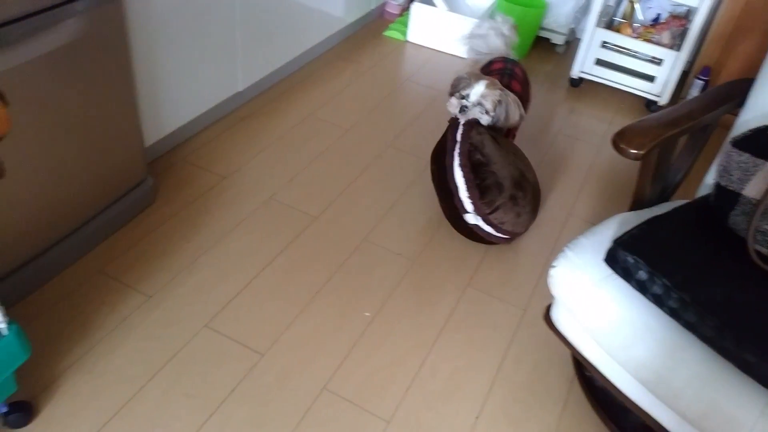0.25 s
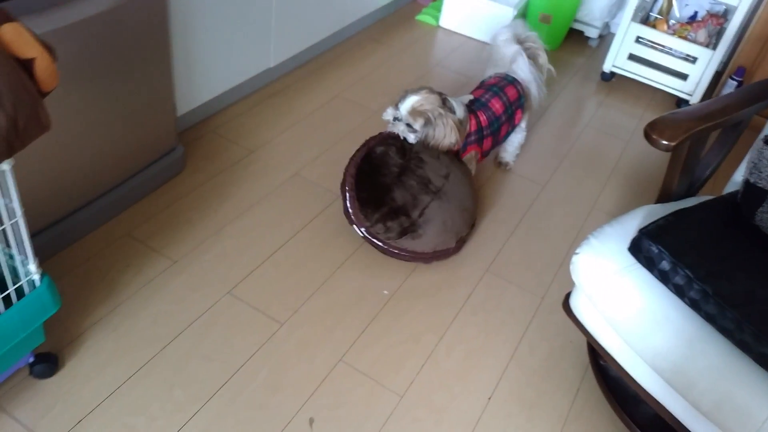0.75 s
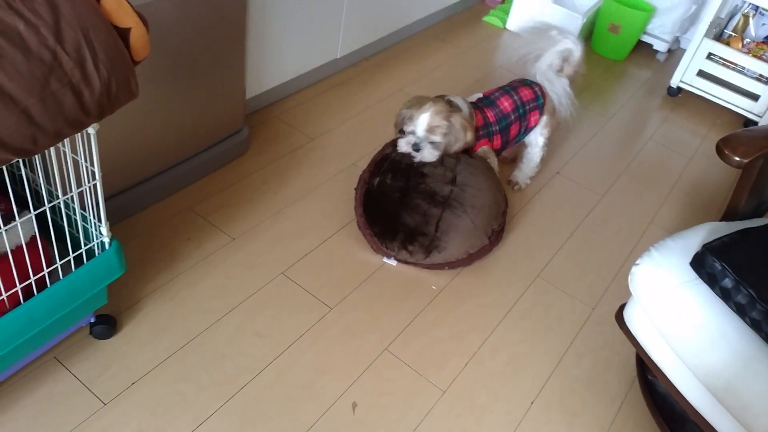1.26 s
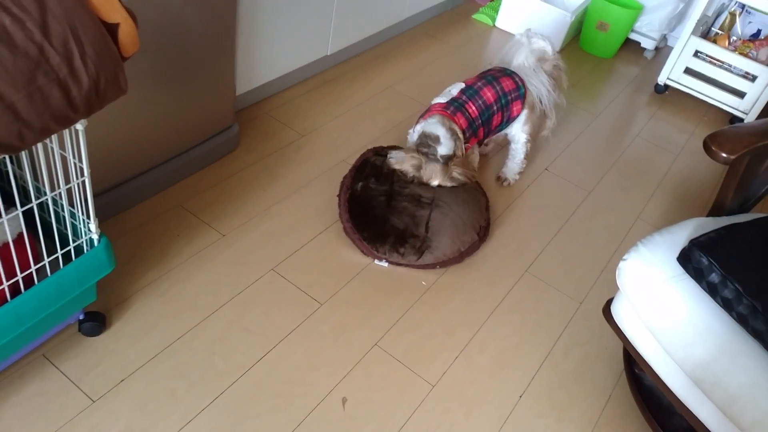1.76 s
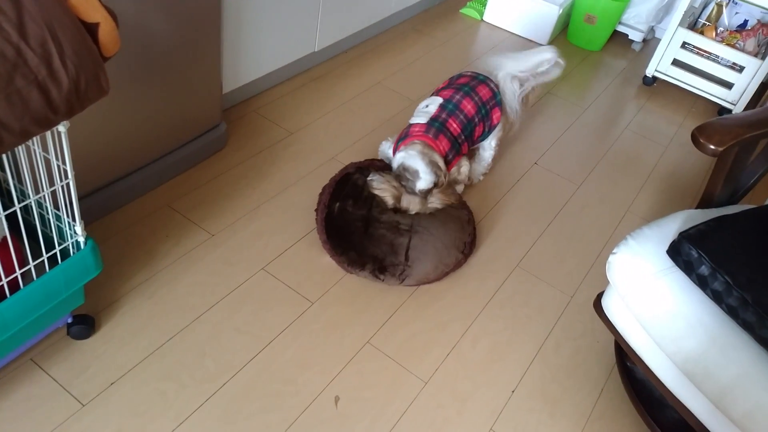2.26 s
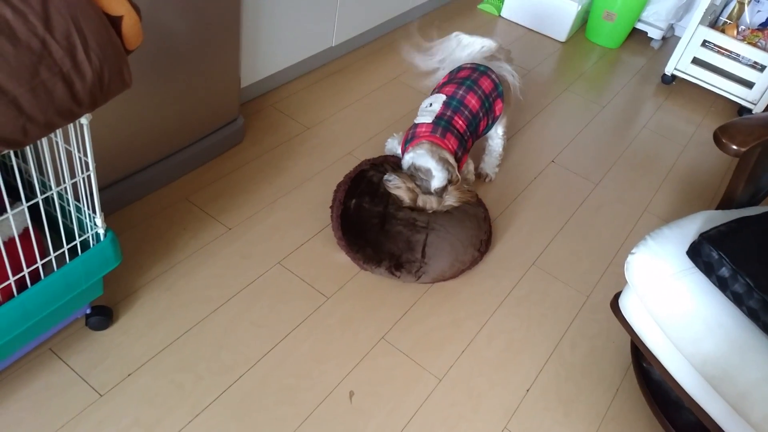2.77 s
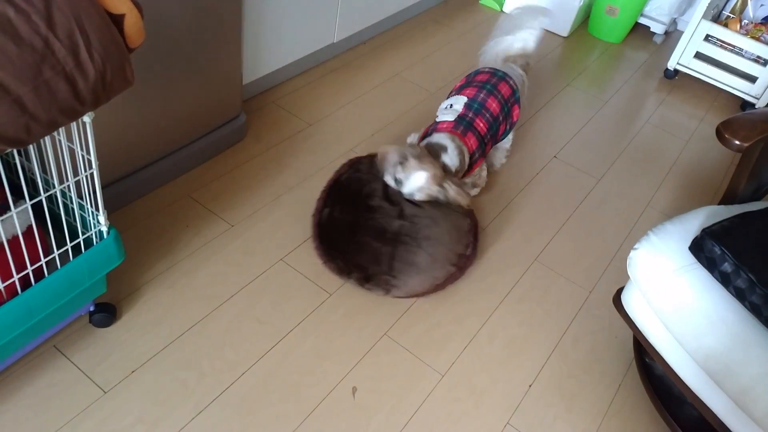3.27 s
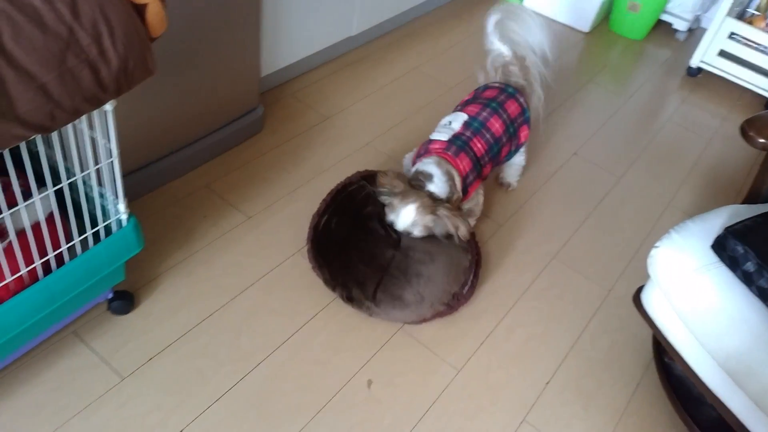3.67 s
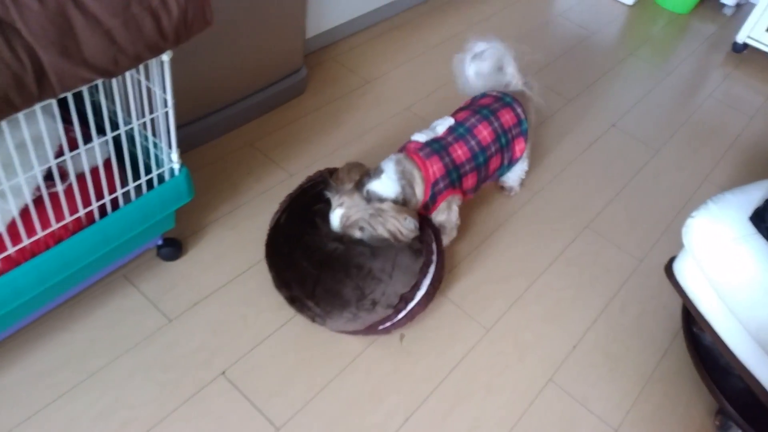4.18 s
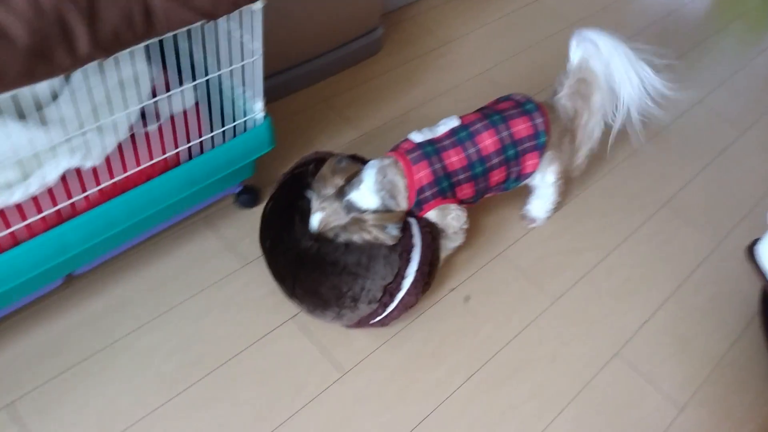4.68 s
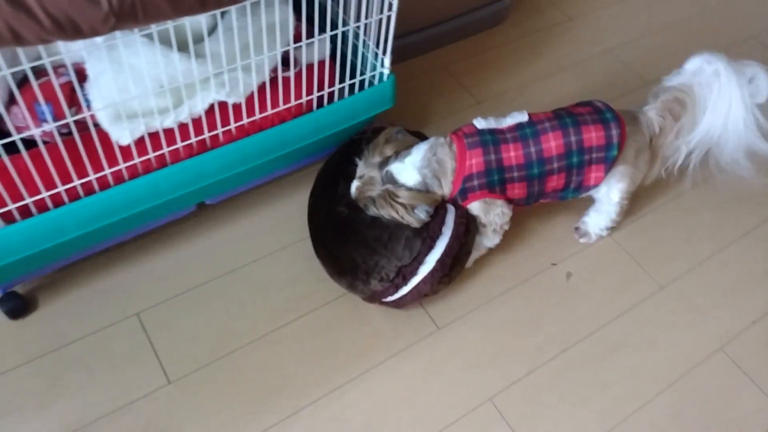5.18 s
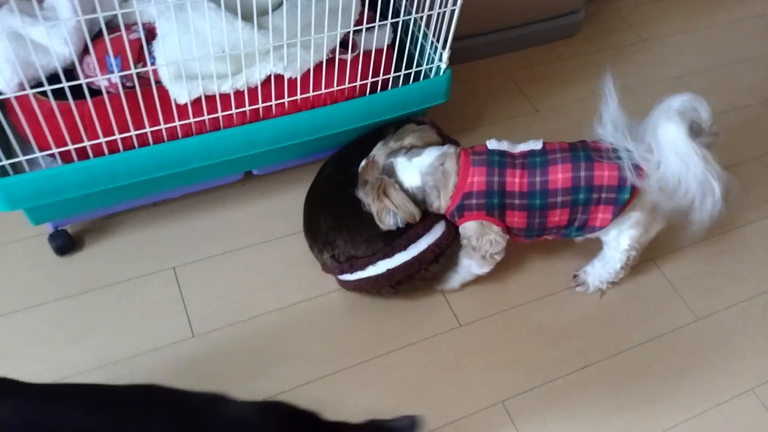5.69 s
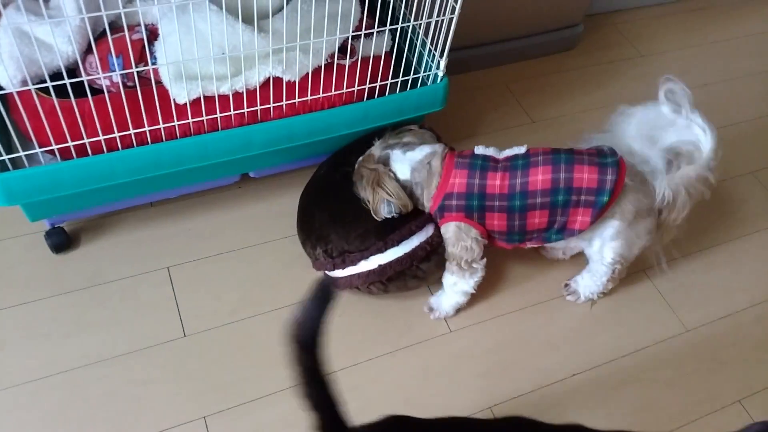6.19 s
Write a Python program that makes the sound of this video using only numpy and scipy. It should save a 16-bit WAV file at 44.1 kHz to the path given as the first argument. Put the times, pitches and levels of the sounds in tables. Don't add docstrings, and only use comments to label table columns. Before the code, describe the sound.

In a furnished room, a small dog pushes a cushion across a wooden floor. Claws skid and low thumps come quickly at first, then quieter, scattered ticks and soft scrapes follow. From the middle onward, clicks become sharper and scrabbles louder, busiest near the end. A low hum swells with the shoves under soft air. The small microphone makes the claws bright and piercing, with short room echoes.

```python
import sys
import numpy as np
from scipy import signal
from scipy.io import wavfile
from scipy.ndimage import uniform_filter1d

SR = 44100
rng = np.random.default_rng(int(sys.argv[2]) if len(sys.argv) > 2 else 0)


def ratio(d):
    e = np.asarray(d, float) / 20
    return 10 ** e


def file_out(sig):
    cols = np.atleast_2d(sig).T
    lim = np.clip(cols, -1, 1)
    pcm = np.round(lim * 32767).astype(np.int16)
    wavfile.write(sys.argv[1], SR, pcm)


N = 284004
SPOTS = 4


def evened(x):
    return x / np.sqrt(np.mean(x ** 2) + 1e-20)


def read(points, hz):
    f, value = np.transpose(points)
    return np.interp(np.log(hz + 1), np.log(f + 1), value)


def curve(rows):
    s, db = np.transpose(rows)
    return np.interp(np.arange(N) / SR, s, db)


def add(mix, s, sound):
    part = mix[round(s * SR):][:len(sound)]
    part += sound[:len(part)]


def band(x, lo_hz, hi_hz):
    return signal.sosfilt(signal.butter(2, [lo_hz, hi_hz], "band", fs=SR, output="sos"), x)


def noise(points, patchy_db, size):
    frames = 4 * N // size + 5
    hz = np.fft.rfftfreq(size, 1 / SR)
    a, b, patches = rng.standard_normal((frames, len(hz), 3)).T
    patches = uniform_filter1d(uniform_filter1d(patches, 8, 0), 8, 1)
    level_db = read(points, hz)[:, None] + patchy_db * evened(patches)
    z = (a + 1j * b) * ratio(level_db)
    return signal.istft(z, nperseg=size, noverlap=3 * size // 4)[1][:N]


# (time [s], level [dB])
HUM = [(0, -44), (.5, -39), (1.1, -42), (1.6, -43), (2.4, -46.5), (3.5, -49.5), (4.5, -49), (5.3, -55),
       (6.44, -49.5)]
# (time of the crest [s], level [dB])
SURGES = [(.15, -35), (.32, -29), (.98, -34), (1.07, -32.5), (1.35, -41), (1.87, -39), (2.04, -37.5),
          (2.169, -35), (2.4, -38.5), (2.64, -58), (2.78, -44), (3.14, -34), (3.25, -60), (3.35, -39),
          (3.931, -31), (4.14, -60), (4.29, -44.5), (4.4, -50), (4.52, -43.5), (4.701, -28), (4.75, -42),
          (4.9, -51), (5.07, -46), (5.36, -42), (5.539, -31.5), (5.6, -34.5), (6.01, -44.5), (6.329, -50)]


def shoves():
    rise_s, fall_s = 0.014, 0.03
    t = np.arange(N) / SR
    strength = ratio(curve(HUM))
    for s, db in SURGES:
        swell = np.exp(-abs(t - s) / np.where(t < s, rise_s, fall_s))
        strength = np.hypot(strength, ratio(db) * swell)
    return strength


def hum():
    hum_hz, waver_hz = 59.14, 0.53
    waver = uniform_filter1d(uniform_filter1d(rng.standard_normal(N), size=3000), size=3000)
    pitch_hz = hum_hz + waver_hz * evened(waver)
    return np.sqrt(2) * shoves() * np.sin(2 * np.pi * np.cumsum(pitch_hz) / SR)


# (frequency [Hz], level [dB per Hz])
AIR = [(40, 10), (80, 12), (250, 5), (500, -5), (1000, -6.5), (2000, -15.5), (4000, -25), (5200, -55),
       (6000, -37), (7500, -56), (10000, -35), (16000, -43), (16900, -37), (17300, -76)]


def air():
    steady = noise(AIR, 1.2, size=2048)
    return ratio(-62) * band(steady, 28, 20000) / band(steady, 176, 1400).std()


# (frequency [Hz], level [dB per Hz])
RUSTLE = [(30, -6.5), (70, 2.5), (110, -3), (200, -7.5), (400, -11), (900, -16), (1500, -42)]
# (time [s], level [dB])
DRAG = [(0, -45.5), (.14, -75), (.95, -54.5), (1.11, -62.5), (1.43, -71.5), (1.74, -83), (1.9, -68.5),
        (2.48, -58), (2.76, -87), (3.17, -78.5), (3.44, -56), (4.1, -68.5), (4.8, -56.5), (5.5, -56),
        (5.75, -65), (5.97, -62.5), (6.22, -87.5), (6.42, -46)]


def rustle():
    knee_db = -73.5
    shove_share = 0.34
    swell = np.minimum(shoves() / ratio(curve(HUM)), 3.2) ** shove_share
    level_db = -53.5 + np.minimum(curve(DRAG) - knee_db, 0)
    return ratio(level_db) * evened(noise(RUSTLE, 3.6, size=1024)) * swell


def grit(shape, spread_db, share):
    clumps = evened(uniform_filter1d(rng.standard_normal(shape), 50, -1))
    slips = rng.standard_normal(shape) * (rng.random(shape) < share)
    return evened(ratio(spread_db * clumps) * slips)


def cushion():
    drag = ratio(curve(DRAG) - 3.5) * grit((SPOTS, N), 5.5, 0.22)
    return drag + ratio(1) * band(drag, 12500, 13000)


def plank(x, hz, width_hz, db):
    return x + ratio(db) * signal.lfilter(*signal.iirpeak(hz, hz / width_hz, SR), x)


def claws(rows, envelope, spread_db, share, gain_db):
    t = np.arange(6000) / SR
    low, mid, top = np.zeros((3, SPOTS, N))
    bursts = grit((len(rows), len(t)), spread_db, share)
    plank_hz = 1200 * 3.2 ** rng.random(len(rows))
    for k, (s, db, knock_db, edge_db, *shape) in enumerate(rows):
        spot = k % SPOTS
        grip = envelope(t, *shape)
        loudness = ratio(db + gain_db) * np.sqrt(np.mean(grip ** 2))
        burst = loudness * evened(bursts[k] * grip)
        add(low[spot], s, ratio(knock_db + 15) * plank(burst, plank_hz[k], 700, -3))
        add(mid[spot], s, burst)
        add(top[spot], s, ratio(edge_db + 23) * burst * (grip / grip.max()) ** 0.52)
    return band(low, 200, 3900) + band(mid, 3900, 9800) + band(top, 9800, 20500)


def slipping(fade):
    def envelope(t, rise):
        swell = np.minimum(t / rise, 1) ** 2
        return swell * np.exp(-np.maximum(t / rise - 1, 0) / fade)
    return envelope


# (time [s], level [dB], wood knock [dB], edge brightness [dB], rise [s])
SKIDS = [(0.002, -27.5, -13, -13, 0.0014), (0.245, -31, -16.5, -19, 0.0071),
         (0.368, -46, -14, -17.5, 0.014), (0.502, -31.5, -16, -23, .011),
         (0.6494, -37.5, -16.5, -16, 0.0061), (0.743, -53, -15.5, -19, 0.0071),
         (0.791, -39.5, -15, -20, 0.0086), (0.9604, -45.5, -14, -30, 0.011),
         (1.3294, -43.5, -11.5, -18.5, 0.0093), (1.98, -41, -15, -22.5, .011),
         (2.1946, -37, -13.5, -18.5, 0.0085), (2.9694, -65, -14, -33, 0.016),
         (3.109, -50, -15, -24, 0.0023), (3.2635, -48, -12, -39, 0.015), (3.652, -40, -13.5, -22, .016),
         (3.868, -39, -15, -17, 0.02), (4.143, -38, -13, -18, 0.0063), (4.684, -34, -14.5, -17.5, 0.012),
         (5.205, -37.5, -15, -16.5, 0.015), (5.3407, -34.5, -19, -14.5, 0.0055),
         (6.238, -44.5, -10, -17.5, 0.019)]


def skids():
    return claws(SKIDS, slipping(1.48), spread_db=3, share=0.15, gain_db=5.27)


def tap(t, slide_db):
    slide_s = 0.038
    strike = 2.5 * np.exp(-t / 0.0002) + 1.5 * np.exp(-t / 0.0028)
    return strike + ratio(slide_db) * np.exp(-t / slide_s)


# (time [s], level [dB], wood knock [dB], edge brightness [dB], slide after the tap [dB])
TICKS = [(0.1351, -39, -16.5, -10.5, 1), (0.463, -39, -17.5, -13, -0.5), (1.026, -29, -18.5, -16, -23),
         (1.2509, -39.5, -16, -13, -1.5), (1.785, -45, -15.5, -14, 0.5), (2.2758, -26, -17, -10.5, -11.5),
         (2.5612, -34.5, -17.5, -16, -13), (3.4232, -34, -22, -10.5, -20), (3.492, -19, -16.5, -15, -19),
         (3.8101, -34, -18, -16.5, -12.5), (4.0177, -18.5, -18.5, -15, -22.5),
         (4.2914, -28.5, -14.5, -12, -13.5), (4.559, -34.5, -17.5, -14, -22), (4.6013, -34, -15, -12.5, -2),
         (4.793, -31, -17.5, -15, -6), (4.8898, -31, -33, -11.5, -10.5), (5.079, -20, -17, -15.5, -34),
         (5.3184, -28.5, -18, -19.5, -31), (5.5085, -25, -11.5, -33.5, -19),
         (5.579, -13.5, -16, -12.5, -43), (5.6569, -30, -15, -28, -10.5), (5.8089, -22.5, -16, -18, -37.5),
         (5.8218, -28.5, -17, -9, -18)]


def taps():
    return claws(TICKS, tap, spread_db=2.5, share=0.42, gain_db=2.45)


# (time [s], level [dB])
CREAKS = [
    (1.8595, -32),
    (2.0985, -53),
    (3.8265, -38),
    (3.115, -42),
    (4.517, -48),
    (4.884, -42),
    (3.722, -44),
    (6.022, -43),
    (6.096, -47),
    (.755, -52),
]


def creaks():
    tip_db = 11.5
    tips = [(s, db + edge_db + tip_db) for s, db, _, edge_db, _ in TICKS]
    out = np.zeros(N)
    for s, db in list(CREAKS) + tips:
        add(out, s, ratio(db) * np.array([1, -0.4]))
    return band(out, 4200, 17000)


def thump(db, hz, rise_ms, knock_db):
    board_cycles = 5.47
    ms = np.arange(8000) / SR * 1000
    turns = hz * ms / 1000 + 0.55 * (1 - np.exp(-ms / 1.2))
    onset = (1 - np.exp(-ms / max(rise_ms, 0.3))) ** 2
    body = np.sin(2 * np.pi * turns) * onset * ratio(-60 * (turns / board_cycles) ** 1.364)
    knock_shape = 0.93 * np.exp(-ms / 1.19) * (1 - np.exp(-ms / 0.26))
    knock = np.sin(2 * np.pi * 0.71 * ms) * knock_shape
    return ratio(db + 3) * (body + ratio(knock_db) * knock)


# (time [s], level [dB], settling pitch [Hz], rise [ms], heel knock [dB])
STEPS = [(0.1862, -13.5, 109, 3.4, -33), (.2925, -12, 124, 3, -21), (0.606, -23.5, 110.3, 2.8, -30),
         (0.7753, -12.5, 113, 2.7, -21), (0.939, -22, 109.6, 3.3, -35), (1.047, -28, 117, 1.6, -14),
         (1.36, -26, 117.1, 6, -34), (3.116, -15.5, 95, 1.13, -9), (3.58, -44, 124, 2.9, -30),
         (3.68, -27, 126.3, 6.2, -30), (3.917, -15.5, 127, 1.9, -24), (4.6836, -13.5, 102.6, 0.69, -4),
         (5.012, -32, 153.4, 0.7, -17), (5.5344, -15, 105, 0.9, -11), (6.246, -42, 132, 1.8, -14)]


def footsteps():
    steps = np.zeros(N)
    for s, *row in STEPS:
        add(steps, s, thump(*row))
    return signal.lfilter(*signal.butter(2, 1400, fs=SR), steps)


# (time [s], level [dB], wood knock [dB], edge brightness [dB], rise [s])
SWELLS = [
    (1.42, -37.5, -15.5, -18.5, 0.034),
    (2.141, -56.5, -7.5, -19, 0.022),
    (2.43, -35.5, -15, -18, 0.025),
    (3.372, -31, -14.5, -17.5, 0.036),
    (4.428, -29, -14, -21, .02),
    (4.865, -32, -16, -15.5, 0.013),
    (4.958, -28, -13.5, -15, 0.0097),
    (5.425, -23, -18, -19, 0.028),
    (5.66, -30, -18, -20, 0.013),
    (6.325, -35, -16.5, -18.5, .038),
]


def scrabbles():
    return claws(SWELLS, slipping(0.88), spread_db=4, share=0.3, gain_db=6.27)


# (frequency [Hz], time to lose 60 dB [s])
ROOM = [(100, 0.36), (500, 0.091), (1300, 0.34), (3500, 0.32), (9000, 0.18), (16000, 0.21)]
# (delay [s], level [dB])
ECHOES = [(.002, 3), (.0037, -8), (.007, -6), (0.011, -16.5), (0.014, -2.5), (.021, -8.5)]


def room(x, wet_db):
    sparse = np.zeros(SR // 2)
    at = np.arange(300, len(sparse) - 20, 20)
    sparse[at + rng.integers(0, 20, len(at))] = rng.choice([-1., 1.], len(at))
    hz, t, z = signal.stft(sparse, SR, nperseg=256)
    fading = z * ratio(-60 * t / read(ROOM, hz)[:, None])
    tail = signal.istft(fading, SR, nperseg=256)[1]
    tail = ratio(wet_db) * tail / np.linalg.norm(tail)
    near = np.zeros(len(tail))
    for s, db in ECHOES:
        near[round(s * SR * rng.uniform(0.85, 1.15))] += ratio(db)
    tail += signal.lfilter(*signal.butter(1, 9000, fs=SR), near)
    tail[0] = 1
    return signal.fftconvolve(x, tail)[:N]


# (frequency [Hz], level [dB])
TICK_COLOUR = [(300, -26), (700, -20), (1400, -22.5), (2600, -16), (4300, -6), (5300, -4.5), (5950, 3.5),
               (6600, -4.5), (7500, -12.5), (8900, -5), (11200, -29), (13700, -29.5), (16600, -48),
               (17500, -46)]


def microphone(x):
    hz = abs(np.fft.fftfreq(4096, 1 / SR))
    log_gain = np.log(ratio(np.maximum(read(TICK_COLOUR, hz), -100)))
    response = np.fft.ifft(np.exp(np.conj(signal.hilbert(log_gain)))).real[:2048]
    return signal.oaconvolve(x, response)[:len(x)]


def scene():
    bright = cushion() + taps() + skids() + scrabbles()
    heard = microphone(sum(room(spot, 3.06) for spot in bright)) + creaks()
    steps = footsteps()
    steps = steps + ratio(-21.5) * room(steps, 6.8)
    return (heard + steps + hum() + air() + rustle())[None]


def band_limit(x):
    return signal.sosfilt(signal.butter(12, 17560, fs=SR, output="sos"), x)


def record(dry):
    edge = signal.firwin(511, 17100, window=("kaiser", 9), fs=SR)
    mix = signal.oaconvolve(dry, edge[None], "same")
    return band_limit(mix)


dry = scene()
out = record(dry)
file_out(out)
```